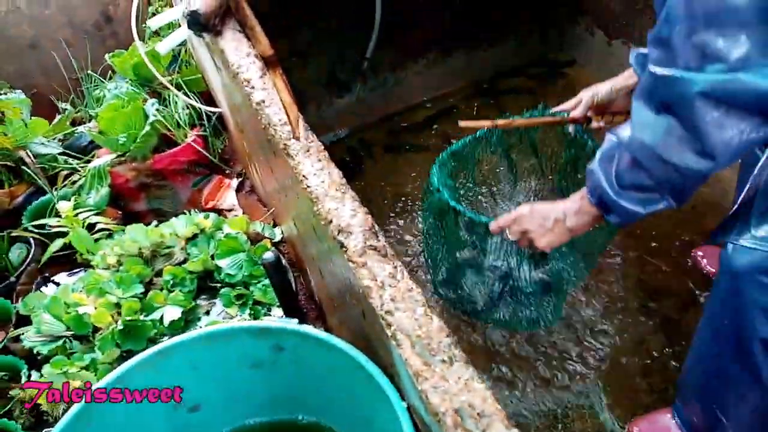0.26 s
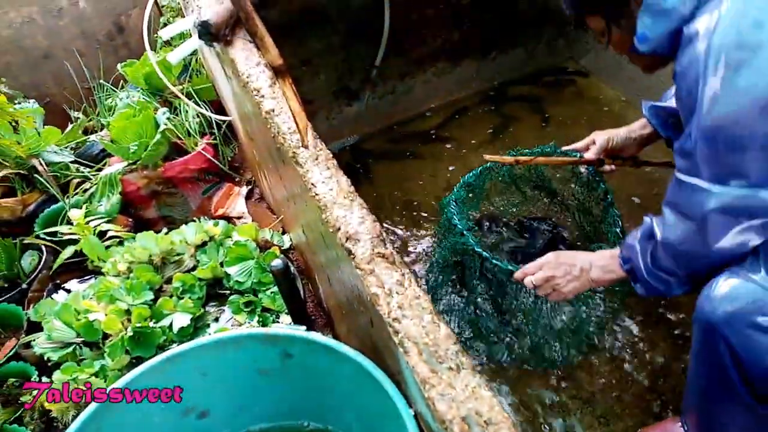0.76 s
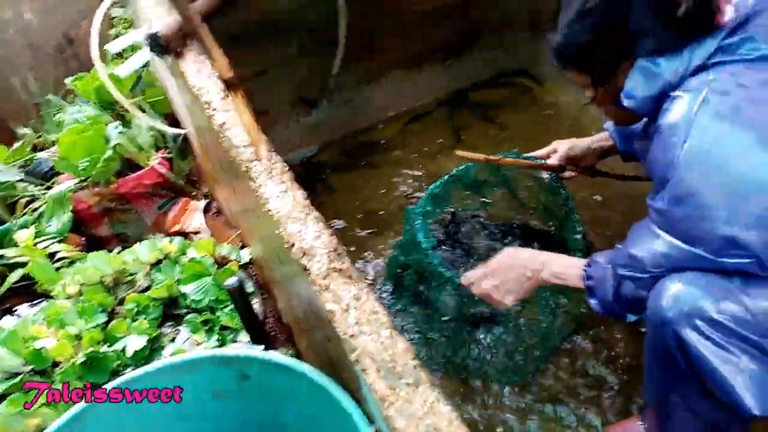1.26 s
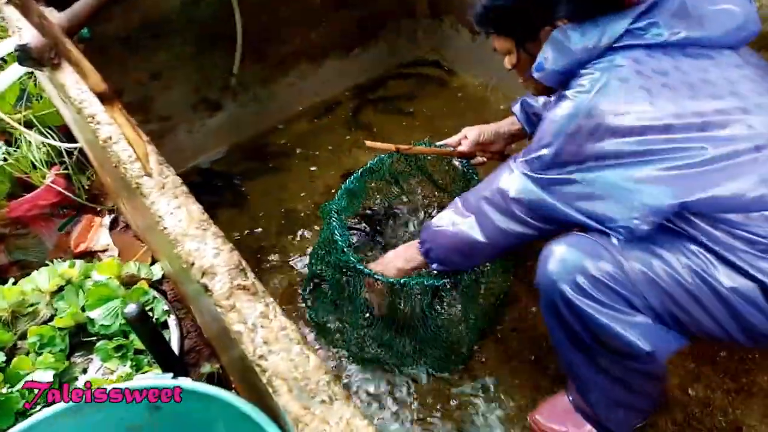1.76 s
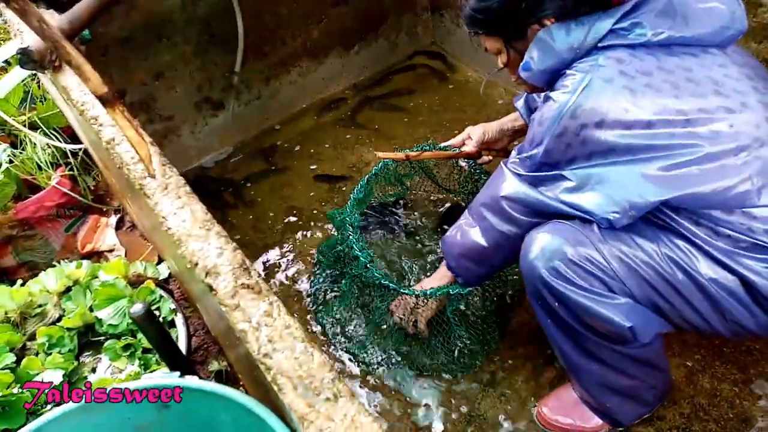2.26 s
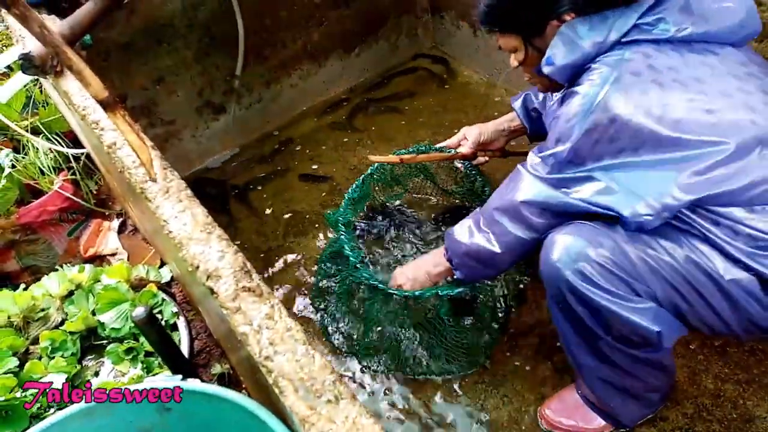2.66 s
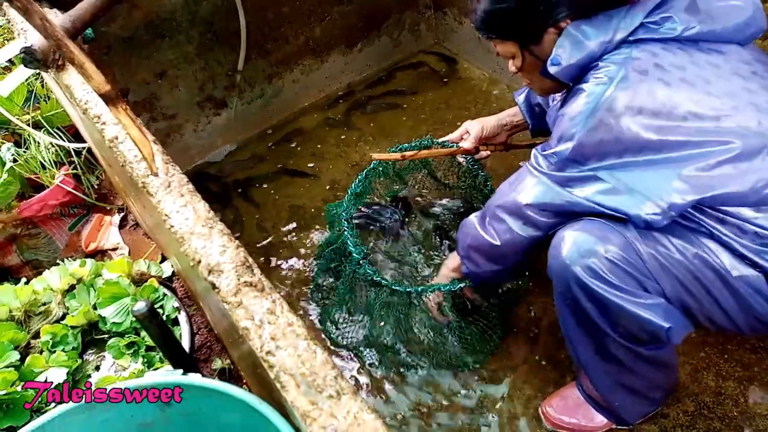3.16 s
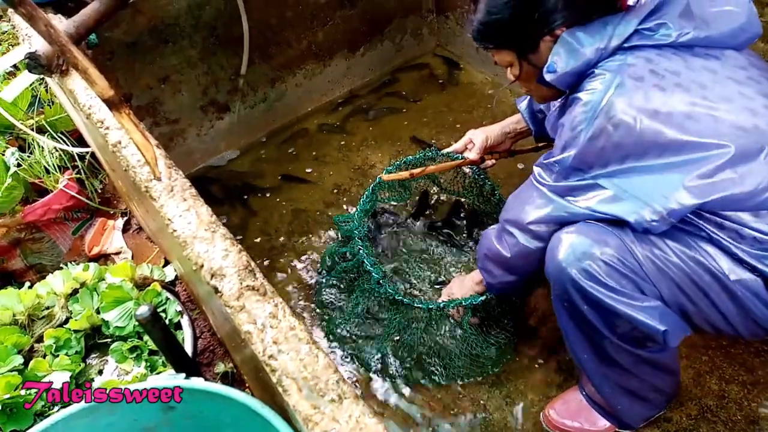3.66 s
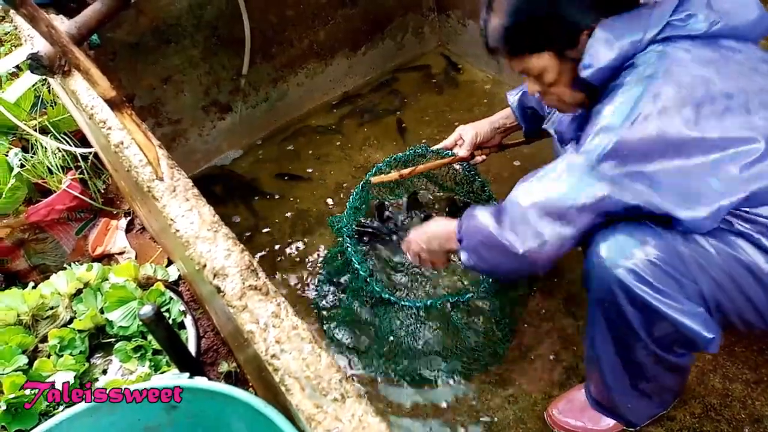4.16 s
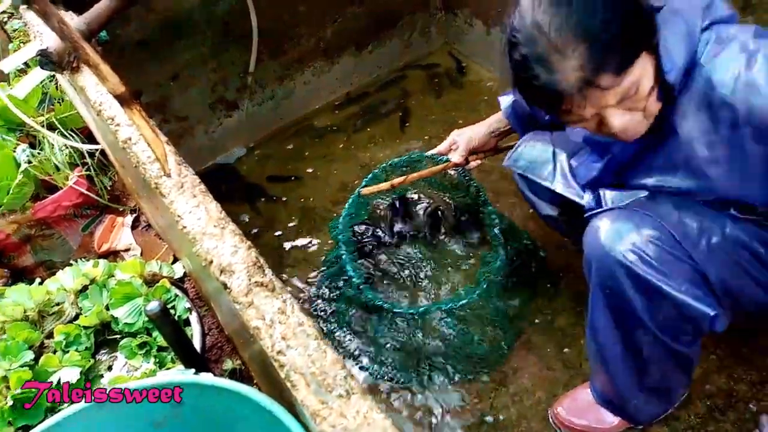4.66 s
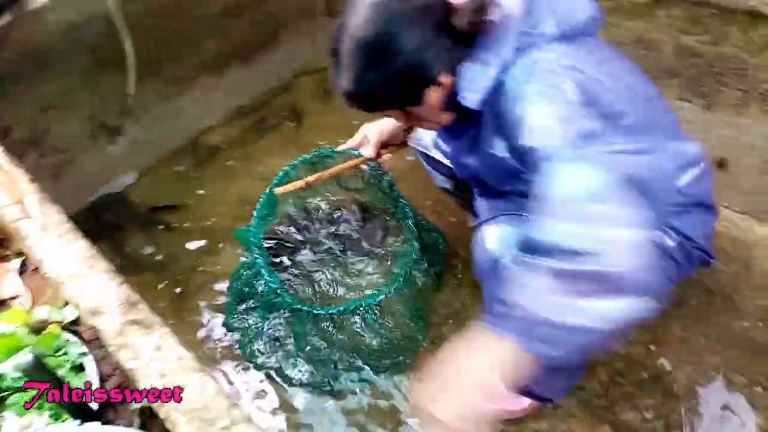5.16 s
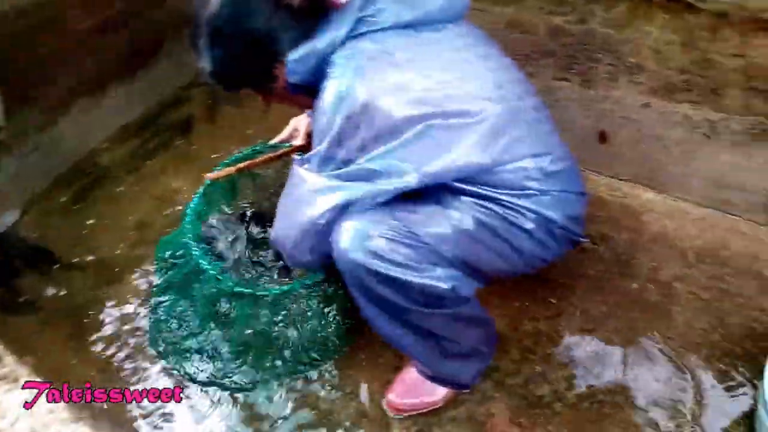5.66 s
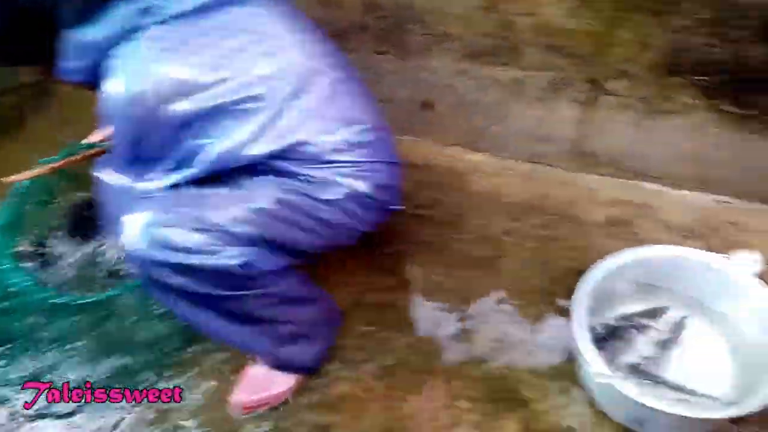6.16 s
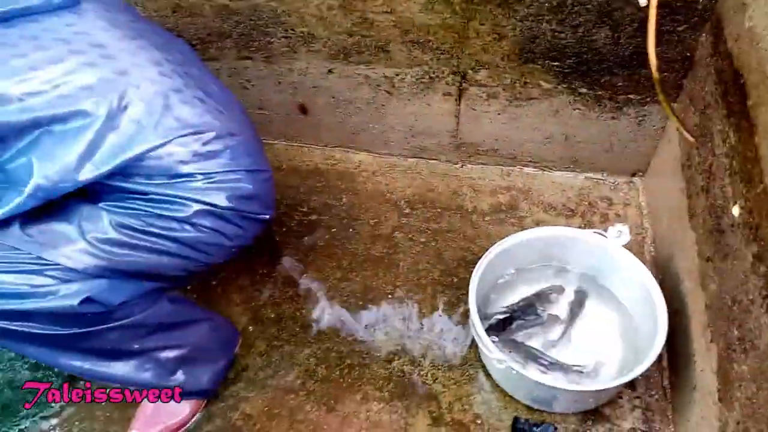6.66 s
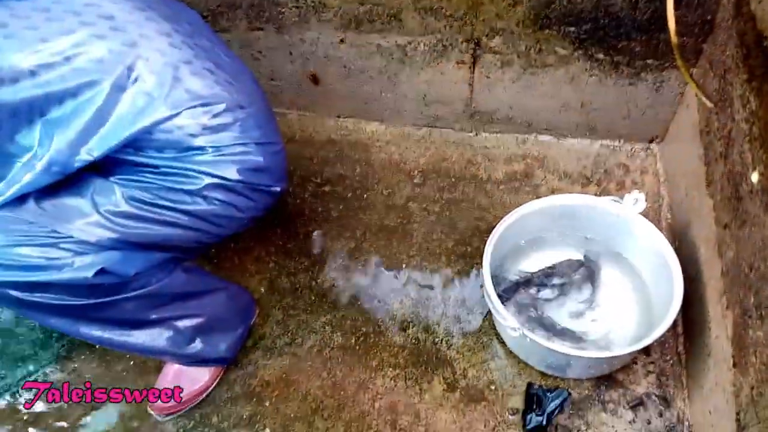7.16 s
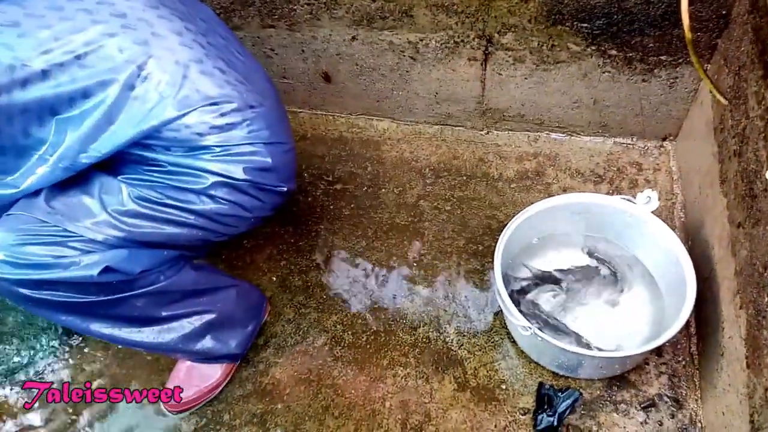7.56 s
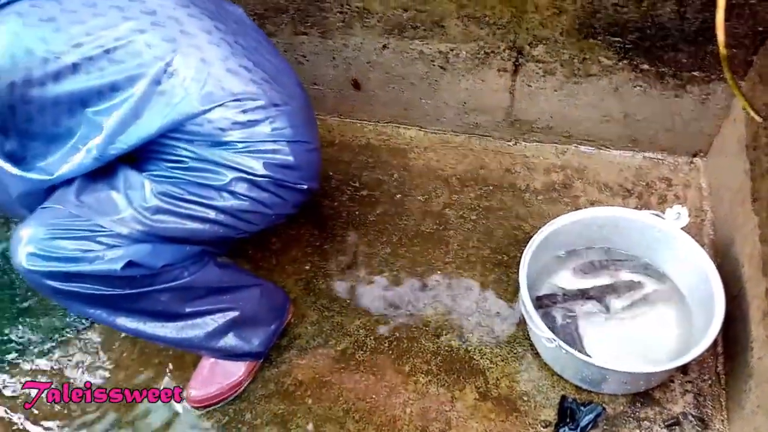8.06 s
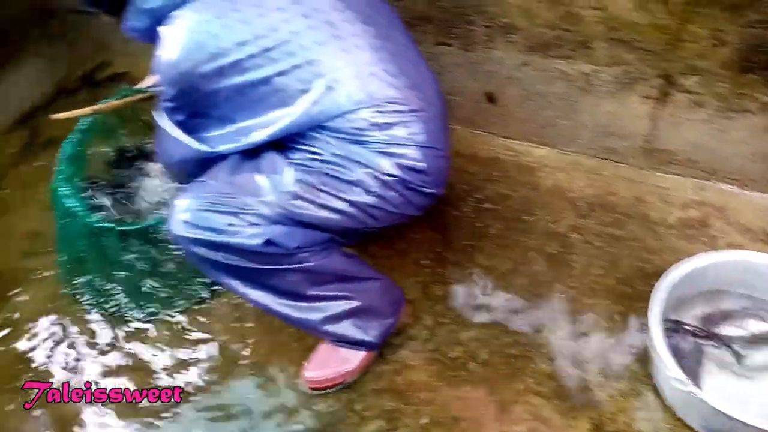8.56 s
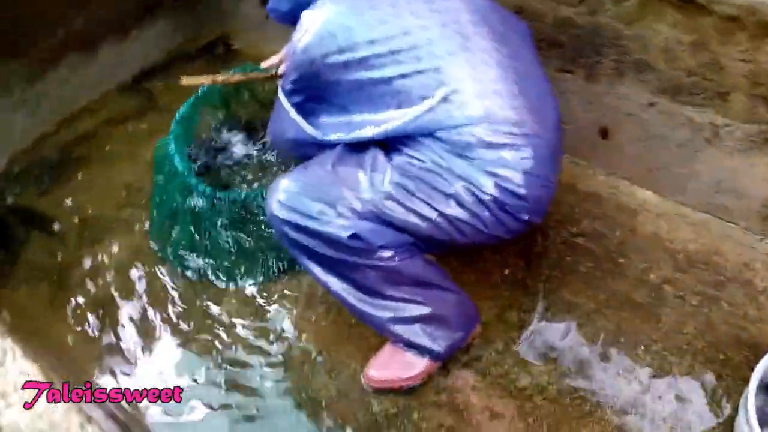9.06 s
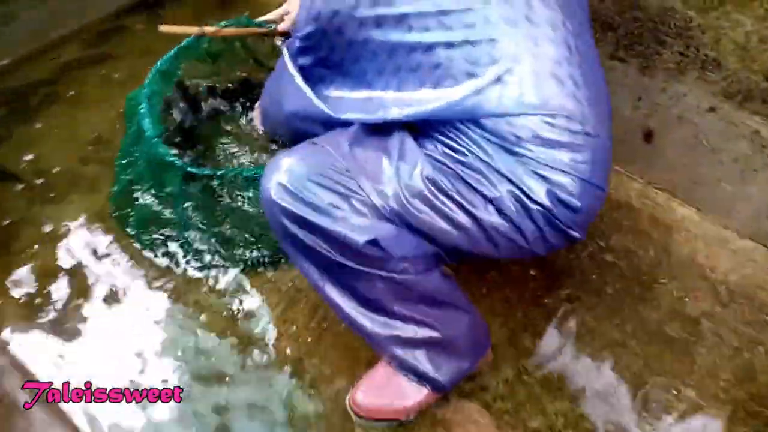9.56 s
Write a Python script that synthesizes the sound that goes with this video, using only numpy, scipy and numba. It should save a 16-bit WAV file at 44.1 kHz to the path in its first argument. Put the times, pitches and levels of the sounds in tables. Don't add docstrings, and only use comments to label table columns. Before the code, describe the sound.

Close stereo sound of fish flapping in a net in a shallow concrete tank. It opens with a rush of draining spray, settles into light drips, small slaps and bubbly plops, goes nearly quiet, then bursts into sharp wet slaps and busier splashing. Walls return short, tight echoes; a very faint motor hums far off. The right side is brighter, the left duller.

```python
import sys
import numpy as np
from scipy import signal
from scipy.fft import rfft, irfft, next_fast_len
from scipy.io import wavfile
from scipy.ndimage import uniform_filter1d, map_coordinates
from numba import njit

SR = 44100
rng = np.random.default_rng(int(sys.argv[2]) if len(sys.argv) > 2 else 0)


def volts_from_db(level):
    exponent = np.asarray(level, float) / 20
    return 10 ** exponent


def pcm_store(signal):
    levels = np.round(np.clip(np.atleast_2d(signal), -1, 1) * 32767)
    wavfile.write(sys.argv[1], SR, levels.astype(np.int16).T)


N = 433062

# peak_s, spray_db, swell_s, fade_s, depth_db
SORTING_THRASHES = [(0, -25.5, .05, 0.23, -10.5), (.28, -34, 0, 0.07, -14), (.68, -46, 0.7, 0.3, -0.5),
                    (.91, -37, 0.22, 0.29, -11.5), (1.43, -34, 0.04, 0.0854, -7.5),
                    (1.67, -41, 0.15, 0.1, -9), (1.83, -42.5, 0.3, 0.16, -6.5), (2.29, -47.5, 1, -0.6, -32),
                    (2.391, -41, 0.17, 0.14, -8.5), (2.501, -45.5, -0.04, 0.3, -3.5),
                    (2.68, -42.5, 0.2, 0.5, -30), (2.86, -39, -0.12, 0.2, -15.5),
                    (3.0, -36, 0.15, -0.5, -14), (3.16, -40, 0.07, 1.43, -17.5),
                    (3.341, -32.5, 0.02, -0.27, -11), (3.499, -42, 0.44, -1.13, -17),
                    (3.65, -41, 0.04, -0.54, -8), (3.885, -43.5, 0.02, 0.1, -0.5),
                    (4.25, -47.5, -0.5, 0.46, -5.5), (4.745, -41, 0, 1, -8),
                    (4.985, -28.5, -0.0436, 0.1, -9.5), (5.091, -32, -0.0228, 0.0952, -6.5),
                    (5.218, -30, -0.06, 0.06, -10.5), (5.43, -47, 0.1, 0.17, -13)]
# peak_s, spray_db, swell_s, fade_s, depth_db
GRABBING_THRASHES = [(5.712, -35, 0.04, 0, -9), (5.904, -42.5, 0.03, 0.03, -2),
                     (5.978, -27.5, -0.0044, 0.08, -10), (6.11, -33, 0, 0.07, -2),
                     (6.23, -27.5, -0.03, 0.14, -25), (6.3, -31, 0.11, 0.14, -5),
                     (6.42, -32, 0.05, 0.1, -6.5), (6.731, -37.5, 0.15, 0.09, -1.5),
                     (6.88, -36, 0.17, 0.09, -3), (6.977, -26, 0.1046, 0.0755, -3.5),
                     (7.08, -34, 0.1, -0.05, -7.5), (7.22, -39, 0.86, 2, -23), (7.325, -35, -0.16, 0.2, -8),
                     (7.381, -32, 0, 0.12, -9), (7.7, -35, 0.02, 0.19, -2.5), (7.84, -34, 0.02, 0.07, -6.5),
                     (8.142, -34, 0.08, 0.1, -6), (8.442, -43, -0.17, 0.26, -23.5),
                     (8.499, -31.5, 0.05, 0.0947, -8.5), (8.859, -39, 0.1, 0.14, -11.5),
                     (9.036, -33.5, -0.04, 0.1, -9.5), (9.118, -40, -0.09, -0.21, 4),
                     (9.24, -35, 0.01, 0.05, -14), (9.789, -37.5, 0.12, -3.5, -21)]
# offset_db, depth_share (ratio), linger (factor), calm_offset_db
WATER_ANSWERS = [
    (0.0, 0.029, 0.85, 0),
    (-3.5, 0.45, 0.88, -16),
    (-2, 0.91, 0.89, -17),
    (-23.5, 0.67, 1, 1),
]
# time_s, spray_db, slosh_db
CALM_WATER = [(0, -32, -44.5), (.9, -48.5, -51), (1.3, -49, -57), (1.7, -49.5, -47.5), (2.0, -52, -70.5),
              (3.2, -60, -62), (4.1, -67, -63), (4.3, -60.5, -53), (4.6, -57, -59.5), (5.3, -48, -50.5),
              (6.3, -40.5, -68), (7.5, -71, -65), (8.8, -55.5, -69.5), (9.5, -48, -86), (9.82, -42, -69)]
# frequency_hz, density_db (per Hz)
SPRAY_SPECTRUM = [(2200, 4.5), (3600, 0.5), (6400, 6.5), (9000, 2), (11000, -5), (13600, -9), (14700, 0.5),
                  (16000, 3)]
# start_s, peak_db, lowest_hz, t60_s
TAIL_SLAPS = [(.0016, -15, 5030, 0.0086), (.141, -21, 5050, 0.013), (0.5504, -19.5, 2040, 0.032),
              (0.8322, -20, 4020, 0.027), (1.176, -25, 3220, 0.027), (1.399, -16, 2190, 0.17),
              (2.47, -18, 1780, 0.03), (2.995, -10.5, 2006, 0.074), (3.154, -11, 4700, 0.028),
              (3.2887, -14.5, 4040, 0.019), (4.746, -13.5, 2480, 0.048), (4.8426, -18.5, 2800, 0.098),
              (4.9741, -4.5, 2700, 0.017), (5.062, -9.5, 2600, 0.07), (5.206, -10, 4000, 0.021),
              (5.965, -14, 3280, 0.044), (6.096, -14.5, 2000, 0.03), (6.4184, -15, 2970, 0.042),
              (6.729, -18.5, 2560, 0.082), (6.916, -9, 2540, 0.035), (6.983, -18, 2200, 0.031),
              (7.0647, -16, 2000, 0.027), (7.3837, -13.5, 2160, 0.02), (7.702, -17, 2485, 0.023),
              (8.493, -15, 3820, 0.013), (8.532, -12.5, 4530, 0.092), (9.006, -19.5, 5800, 0.055)]
# start_s, peak_db, centre_hz, width_octaves
LONE_DROPS = [(0.0293, -9, 6000, 0.44), (0.3903, -14.5, 7900, 0.5), (0.511, -14.5, 6400, 0.15),
              (0.6832, -17, 5700, 3.4), (1.814, -16.5, 4900, 0.22), (1.9952, -20.5, 6500, 1.5),
              (2.154, -20, 6330, 0.88), (2.84, -13.5, 6590, 0.63), (2.868, -10.5, 5190, 0.55),
              (3.495, -12.5, 5230, 0.82), (3.8723, -18.5, 4140, 0.37), (4.9105, -22.5, 2530, 0.69),
              (5.205, -12, 11800, 1), (5.529, -15.5, 6300, 0.22), (5.8038, -21, 6450, 0.92),
              (6.1766, -13, 6160, .3), (6.687, -20.5, 6070, 0.7), (6.878, -8.5, 5900, 0.5),
              (6.964, -10, 5600, 0.6), (7.0862, -11, 6260, 0.47), (7.1415, -12, 9120, 1.1),
              (7.205, -16.5, 7970, 0.59), (7.343, -7.5, 6800, .65), (7.83, -18, 3620, 2),
              (8.0318, -16, 6070, 0.27), (8.4392, -5, 6400, 0.95), (8.8747, -13.5, 5420, 0.87),
              (9.1317, -14, 5860, 0.47), (9.23, -13.5, 5770, 0.41), (9.247, -8, 6280, 0.18)]
# start_s, peak_db, centre_hz, t60_s
WATER_SHEETS = [(0.4864, -31.5, 1720, 0.044), (0.749, -25.5, 4370, 0.075), (0.9043, -26, 2660, 0.069),
                (1.3497, -30.5, 3536, 0.059), (1.452, -29, 2300, 0.042), (1.7569, -32, 3200, 0.06),
                (1.814, -33, 2050, 0.056), (1.8798, -28, 2700, 0.044), (1.9899, -39.5, 4330, 0.05),
                (2.2857, -31.5, 2100, 0.039), (2.509, -32, 1450, 0.054), (2.7596, -32, 2730, 0.035),
                (2.941, -27.5, 2560, 0.062), (2.9687, -22.5, 3550, 0.048), (3.0954, -33.5, 2696, 0.061),
                (3.2839, -24, 3750, 0.063), (3.3333, -24.5, 2420, 0.089), (3.4591, -35, 1300, 0.023),
                (3.597, -33.5, 3600, 0.029), (3.714, -35, 2860, 0.046), (1.587, -31.5, 4060, 0.063),
                (5.919, -29, 1630, 0.06), (5.9848, -23.5, 1810, 0.051), (6.0114, -31, 1810, 0.038),
                (6.2178, -21, 4250, 0.061), (6.273, -21.5, 2230, 0.062), (6.3274, -24, 1340, 0.044),
                (6.356, -23, 2186, 0.13), (6.4036, -22, 2180, 0.045), (6.474, -29, 2850, 0.055),
                (6.6345, -31, 2210, 0.059), (6.7164, -39, 2700, 0.043), (6.8676, -27, 2180, 0.05),
                (6.952, -34, 1680, 0.05), (6.977, -18.5, 1590, 0.039), (7.009, -27, 1430, 0.061),
                (7.1667, -26.5, 3970, 0.02), (7.3213, -25.5, 2744, 0.045), (7.6774, -25.5, 4060, 0.031),
                (7.7112, -28, 1610, 0.032), (7.9299, -29.5, 4130, 0.054), (8.1927, -29, 2320, 0.058),
                (8.3015, -35, 4090, 0.043), (8.4144, -38, 2430, 0.096), (8.8358, -29, 2310, 0.05),
                (9.028, -28, 2430, 0.056), (9.2324, -26, 4050, 0.057), (9.6969, -31, 3740, 0.085)]
# start_s, peak_db, centre_hz, t60_s
FLUNG_BEADS = [(0.0355, -20, 6100, 0.02), (0.075, -19.5, 5990, 0.044), (0.1762, -26, 6900, 0.045),
               (0.2254, -31.5, 6400, 0.033), (0.2748, -24, 5180, 0.072), (0.318, -29, 5610, 0.03),
               (0.435, -29, 4470, 0.047), (1.399, -21.5, 6300, 0.028), (1.703, -28.5, 6600, 0.038),
               (2.247, -38, 6140, 0.017), (2.379, -33, 5500, 0.033), (2.5366, -27, 5400, 0.022),
               (2.625, -25.5, 6460, 0.031), (2.712, -33.5, 6360, 0.054), (2.794, -32, 5340, 0.017),
               (3.3227, -20, 7800, 0.046), (3.378, -23, 6360, 0.069), (3.4777, -30, 5600, 0.012),
               (3.6544, -32, 6540, 0.046), (4.9445, -26, 4900, 0.021), (5.1766, -26, 6030, 0.074),
               (5.843, -43, 5130, 0.024), (5.8835, -47, 6340, 0.025), (6.2342, -20, 5640, 0.026),
               (6.2487, -19.5, 5880, 0.016), (6.308, -26, 6100, 0.027), (6.641, -24.5, 6300, 0.03),
               (7.0687, -21, 6300, 0.022), (7.2542, -28, 5560, 0.058), (7.317, -38.5, 6560, 0.027),
               (7.3704, -18.5, 5700, 0.04), (7.674, -21, 7700, 0.037), (7.866, -23.5, 6320, 0.031),
               (8.0062, -29, 6300, 0.027), (8.253, -26, 5650, 0.016), (8.6142, -28.5, 7200, 0.027),
               (8.636, -29, 6240, 0.039), (8.96, -28.5, 5930, 0.03), (9.111, -29, 6400, 0.03),
               (9.7587, -31, 4860, 0.03)]
# start_s, peak_db, pitch_hz (at first), life_s
SORTING_BUBBLES = [(0.058, -31, 960, 0.034), (.093, -35, 960, 0.054), (.552, -32, 960, 0.0076),
                   (.686, -32, 785, 0.012), (1.571, -33, 1427, 0.025), (1.757, -36, 1660, 0.021),
                   (1.912, -42, 990, 0.0074), (1.982, -41.5, 846, 0.028), (5.603, -38, 691, 0.013),
                   (2.366, -36.5, 876, 0.038), (2.466, -25.5, 2000, 0.0099), (2.519, -35.5, 437, 0.025),
                   (3.389, -37, 660, 0.019), (3.527, -31, 798, 0.026), (3.6, -32.5, 840, 0.014),
                   (3.882, -33.5, 708, 0.0066), (3.917, -27, 1480, 0.0092), (4.308, -32, 493, 0.0078),
                   (4.909, -22, 2740, 0.0074), (4.926, -34.5, 1276, 0.031), (4.976, -22.5, 520, 0.018),
                   (5.098, -26.5, 894, 0.0091), (5.355, -27.5, 455, 0.006), (5.406, -30.5, 1486, 0.01),
                   (5.436, -32, 894, 0.0058), (.12, -37, 990, 0.017), (.345, -33.5, 1010, 0.014),
                   (.409, -27.5, 1430, 0.0091), (.885, -38.5, 800, 0.013), (1.145, -39.5, 850, 0.012),
                   (2.611, -43.5, 1883, 0.047), (2.67, -44.5, 1893, 0.057), (2.896, -35, 970, 0.0091),
                   (3.2, -37.5, 1410, .01), (3.456, -34.5, 1012, 0.013), (4.742, -35, 910, 0.011),
                   (5.27, -36, 1035, 0.0072), (0.771, -29, 1390, 0.0097), (1.234, -40, 1535, 0.019),
                   (3.742, -40.5, 1650, 0.013), (4.008, -39.5, 1736, 0.014), (4.523, -36, 600, 0.0075)]
# start_s, peak_db, pitch_hz (at first), life_s
GRABBING_BUBBLES = [(5.675, -34.5, 1384, 0.025), (5.858, -40, 900, 0.019), (6.096, -24, 2010, .009),
                    (6.274, -21, 1230, 0.0075), (6.54, -33, 815, 0.028), (6.912, -24, 1330, 0.0073),
                    (7.063, -18.5, 2210, 0.008), (7.38, -31, 926, 0.032), (7.702, -19, 1520, 0.0068),
                    (7.762, -30, 498, 0.018), (7.808, -37, 457, 0.029), (7.838, -31, 1165, 0.038),
                    (8.07, -32, 1045, 0.017), (8.125, -30, 790, 0.03), (8.407, -25.5, 2416, 0.015),
                    (8.476, -24.5, 935, 0.02), (8.537, -32, 926, 0.031), (8.835, -26, 1920, 0.007),
                    (8.871, -38, 899, 0.02), (9.186, -38, 916, 0.025), (9.226, -36, 890, 0.02),
                    (9.671, -32, 790, 0.005), (5.884, -34, 1010, 0.018), (6.168, -31, 1800, 0.015),
                    (6.213, -26.5, 860, 0.009), (7.17, -35, 1170, 0.011), (7.585, -37.5, 1430, 0.018),
                    (9.289, -44, 880, 0.0084), (9.11, -40, 510, 0.012), (7.742, -26.5, 2260, 0.014),
                    (8.088, -32, 1430, 0.0077), (8.275, -39.5, 1230, 0.0072)]
# start_s, peak_db, pitch_hz (at first), length_s, glide_octaves
CLOSING_CAVITIES = [
    (1.881, -30, 1550, 0.086, -.25),
    (2.504, -36.5, 603, 0.063, 1.1),
    (4.91, -30, 2300, .08, -.6),
    (5.425, -29, 641, 0.076, 0.64),
    (5.697, -29, 1485, 0.07, 0.31),
    (8.404, -33.5, 1820, 0.07, -0.23),
]
# time_s, firing_hz, level_db
FAR_MOTOR = [(0, 70, -54.5), (.45, 73.25, -61.5), (.9, 78, -53), (1.4, 81.2, -59), (1.8, 85.6, -63.5),
             (2.3, 79.7, -69), (3.3, 77.8, -65), (3.9, 75.8, -77), (5.1, 73.6, -64), (5.6, 79.4, -58),
             (6.0, 82.2, -58.5), (6.35, 81.8, -57), (6.5, 78.1, -84), (8, 77.4, -79), (9.82, 77.8, -82)]
# multiple (of the firing rate), level_db
MOTOR_ORDERS = [(1, -0.5), (1.5, -9), (2, -8), (2.5, -5.5), (3, -7.5), (4, -5)]
# frequency_hz, density_db (per Hz)
AIR_SPECTRUM = [(30, -40), (50, 1), (180, 11), (256, -58), (320, 10.5), (715, -24), (965, -13), (4030, 0),
                (6490, 6.5), (16000, -56)]
# time_s, lead_ms, shading_db
LEFT_HEAD_START = [(0, 1.03, 1.5), (1.5, 1.026, 0), (3, 1.24, 0), (4.2, 1, 0), (4.7, 0.78, 1),
                   (5.6, 0.79, 0), (6, 1.41, -0.5), (8.6, 1.45, -0.5), (9.2, 1.06, 1), (9.82, 1.57, -3)]
# frequency_hz, gain_db
LEFT_SHADOW = [(60, -7.5), (150, -4.5), (380, -7), (950, -5), (2380, -3), (5980, -12), (15000, -25)]


def rms_one(x):
    return x / np.sqrt(np.mean(x ** 2) + 1e-20)


def in_time(rows):
    times_s, *columns = np.transpose(rows)
    return [np.interp(np.arange(N) / SR, times_s, column) for column in columns]


def coloured(x, spectrum):
    size = next_fast_len(N + 4096)
    hz, db = np.transpose(spectrum)
    bins_hz = np.arange(size // 2 + 1) * SR / size
    gain = volts_from_db(np.interp(np.log(bins_hz + 1), np.log(hz), db))
    return irfft(rfft(x, size) * gain, size)[..., :N]


def band(x, low_hz, high_hz, order=2):
    sos = signal.butter(order, [low_hz, min(high_hz, SR / 2.2)], "band", fs=SR, output="sos")
    return signal.sosfilt(sos, x)


def drift(rate_hz):
    pole = np.exp(-2 * np.pi * rate_hz * 40 / SR)
    noise = rng.standard_normal(N // 40 + 2002)
    slow = signal.lfilter([1], [1, -2 * pole, pole * pole], noise)[2000:]
    return np.interp(np.arange(N) / 40, np.arange(len(slow)), rms_one(slow))


def wide_noise(alike, length=N):
    common, left, right = rng.standard_normal((3, length))
    alike = np.clip(alike, 0, 1)
    return np.sqrt(alike) * common + np.sqrt(1 - alike) * np.array([left, right])


def churn():
    t = np.arange(0, N, 64) / SR
    drip_db, wade_db = in_time(CALM_WATER)
    peak_s, db, swell_s, fade_s, depth_db = np.transpose(SORTING_THRASHES + GRABBING_THRASHES)[:, :, None]
    levels = []
    calm_levels = (drip_db, drip_db, drip_db, wade_db)
    for (offset_db, share, linger, calm_offset_db), calm_db in zip(WATER_ANSWERS, calm_levels):
        before = (peak_s - t) / np.maximum(swell_s, .01)
        after = (t - peak_s) / np.maximum(linger * fade_s, .01)
        away = np.where(t < peak_s, before, after)
        power = np.sum(volts_from_db(db + offset_db + share * depth_db - 10 * away) ** 2, axis=0)
        power = np.interp(np.arange(N) / SR, t, power)
        levels.append(10 * np.log10(power + volts_from_db(calm_db + calm_offset_db) ** 2))
    return levels


def impacts():
    rows = [(s, db, hz, wide, 0.011 * (6000 / hz) ** 2.1) for s, db, hz, wide in LONE_DROPS]
    rows += [(s, db + 2.5, hz, 0.78, max(t60, .004)) for s, db, hz, t60 in WATER_SHEETS]
    rows += [(s, db + 4.5, hz, 0.34, max(t60, .004)) for s, db, hz, t60 in FLUNG_BEADS]
    struck = [(s, db, hz / 2 ** (wide / 2), hz * 2 ** (wide / 2), t60) for s, db, hz, wide, t60 in rows]
    struck += [(s, db, hz, 7130 * (hz / 3000) ** 0.25, t60) for s, db, hz, t60 in TAIL_SLAPS]
    return struck


def slaps():
    out = np.zeros((2, N))
    t = np.arange(round(.15 * SR)) / SR
    for start_s, db, low_hz, high_hz, t60 in impacts():
        ragged = volts_from_db(3.93 * rms_one(uniform_filter1d(rng.standard_normal(len(t)), size=40)))
        decay = volts_from_db(-60 * t / t60) + 0.13 * volts_from_db(-60 * t / 0.097)
        shape = decay * (1 - np.exp(-t / (0.089 * t60)))
        burst = wide_noise(0.43, length=len(t)) * shape * ragged
        top = band(burst, low_hz, high_hz)
        top = top + 0.04 * band(burst, 6200, 12500, order=1)
        top = top + 0.085 * band(burst, 13300, 14800)
        body = 5.7 * t60 * band(burst, 1120, 2420)
        at = round(start_s * SR)
        out[:, at:at + len(t)] += volts_from_db(db - 2.5) * (top + body)[:, :N - at] / np.abs(top[1]).max()
    return out


@njit
def add_bubbles(out, start, size, hz, t60, rise, onset_s, rate):
    for k in range(len(start)):
        length = int(t60[k] * rate)
        phase = 0.0
        for i in range(min(length, len(out) - start[k])):
            phase += 2 * np.pi * hz[k] * 2 ** (rise[k] * min(4 * i / length, 1.5)) / rate
            swell = 1 - np.exp(-i / (onset_s[k] * rate + 1))
            out[start[k] + i] += size[k] * swell * np.exp(-6.9 * i / length) * np.sin(phase)


def swarm(low_hz, high_hz, cycles, spread_db, clumps, scatter_ms, count):
    draw = rng.random((count, 6))
    out = np.zeros((2, N))
    start = (draw[:, 0] * N).astype(np.int64)
    hz = low_hz * (high_hz / low_hz) ** draw[:, 1]
    loudness = volts_from_db(-spread_db * np.log(draw[:, 2] + .04))
    size = loudness * clumps[start] * (hz / low_hz) ** 0.61
    life_s = cycles * (0.25 + 1.77 * draw[:, 3]) / hz
    rise_octaves = 0.663 * draw[:, 4] ** 2
    left_lag = draw[:, 5] * scatter_ms * SR / 1000
    for port, lag in zip(out, (left_lag, 0)):
        add_bubbles(port, start + np.int64(lag), size, hz, life_s, rise_octaves, 0.19 / hz, SR)
    return rms_one(out)


def spray(level_db, surge_db):
    fizz_clumps = volts_from_db(surge_db + 8.5 * np.tanh(2.1 * drift(46)))
    fizz = swarm(3860, 13700, cycles=19.8, spread_db=3.0, clumps=fizz_clumps, scatter_ms=0.2, count=16000)
    bead_clumps = volts_from_db(surge_db + 1.0 * drift(12.0))
    beads = swarm(3960, 9330, cycles=66.0, spread_db=1.5, clumps=bead_clumps, scatter_ms=0.33, count=3000)
    edges_hz = np.geomspace(2500, 16000, num=5)
    gusts_db = surge_db + 2.4 * drift(24.0)
    hiss = np.zeros((2, N))
    for low_hz, high_hz in zip(edges_hz, edges_hz[1:]):
        hiss += band(wide_noise(0.22), low_hz, high_hz) * volts_from_db(gusts_db + 3.03 * drift(29.4))
    mixed = 0.7 * fizz + 0.28 * beads + 0.94 * rms_one(hiss)
    return volts_from_db(level_db) * rms_one(coloured(mixed, SPRAY_SPECTRUM))


def bubbling(level_db, surge_db, low_hz, high_hz, cycles, alike, count):
    clumps = volts_from_db(surge_db + 3.96 * np.tanh(0.8 * drift(19)))
    bubbles = swarm(low_hz, high_hz, cycles, spread_db=2.5, clumps=clumps, scatter_ms=0.32, count=count)
    noise = rms_one(band(wide_noise(alike), low_hz, high_hz) * clumps)
    return volts_from_db(level_db) * rms_one(bubbles + .25 * noise)


def plops():
    trapped = [(s, db - 6.5, hz, 0.21 * t60) for s, db, hz, t60 in WATER_SHEETS]
    start_s, db, hz, life_s = np.transpose(SORTING_BUBBLES + GRABBING_BUBBLES + trapped)
    out = np.zeros(N)
    life_s = np.maximum(life_s, .003)
    glide = 0.047 - 0.051 * np.log2(hz / 1000)
    start = (start_s * SR).astype(np.int64)
    add_bubbles(out, start, volts_from_db(db + 5.0), hz, 2.98 * life_s, glide, 0.18 * life_s, SR)
    satellite_db, satellite_s, satellite_octaves = -12, .025, 0.245
    for late, apart in np.transpose(rng.random((len(start_s), 2, 2))):
        start = ((start_s + satellite_s * late) * SR).astype(np.int64)
        satellite_hz = hz * 2 ** (satellite_octaves * (2 * apart - .6))
        size = volts_from_db(db + 6.0 + satellite_db)
        add_bubbles(out, start, size, satellite_hz, 3.0 * life_s, glide, 0.16 * life_s, SR)
    start_s, db, hz, length_s, glide = np.transpose(CLOSING_CAVITIES)
    start = (start_s * SR).astype(np.int64)
    add_bubbles(out, start, volts_from_db(db + 3.5), hz, length_s, glide, 0.062 * length_s, SR)
    return out * (1 + .5 * drift(175))


def tank(x):
    t60_s = .08
    t = np.arange(round(.3 * SR)) / SR
    onset = np.clip((t - .002) / 0.00051, 0, 1)
    echoes = rng.standard_normal((2, len(t))) * volts_from_db(-60 * t / t60_s) * onset
    echoes = band(echoes, 640, 3970, order=1)
    echoes = echoes / np.sqrt(np.sum(echoes ** 2) / 2)
    return signal.fftconvolve(x, echoes, axes=1)[:, :N]


def motor():
    firing_hz, hum_db = in_time(FAR_MOTOR)
    phase = 2 * np.pi * np.cumsum(firing_hz * (1 + .005 * drift(6))) / SR
    swing_db = hum_db + 60
    hum = np.zeros(N)
    for multiple, db in MOTOR_ORDERS:
        if multiple == 1:
            order_db = db + swing_db
        else:
            order_db = db + 0.67 * swing_db + 6 * drift(2.5)
        hum += np.sin(multiple * phase + multiple * multiple) * volts_from_db(order_db)
    rumble = rms_one(band(wide_noise(1.0), 79, 235)) * volts_from_db(0.48 * drift(19.0))
    return volts_from_db(-59.5) * hum + volts_from_db(-62 + 0.38 * swing_db) * rumble


def air():
    return volts_from_db(-65) * rms_one(coloured(wide_noise(0.37), AIR_SPECTRUM))


def scene():
    spray_db, droplets_db, gurgle_db, slosh_db = churn()
    surge_db = 1.14 * np.tanh(1.0 * drift(15.5))
    droplets = bubbling(droplets_db, surge_db, low_hz=1694, high_hz=4065, cycles=26.9, alike=0.4, count=4500)
    gurgle = bubbling(gurgle_db + 0.5, surge_db, low_hz=765.4, high_hz=1869, cycles=30.1, alike=0.14,
                      count=3200)
    slosh = bubbling(slosh_db - 2.5, surge_db, low_hz=257, high_hz=552, cycles=11.5, alike=0.99, count=1200)
    water = spray(spray_db, surge_db) + droplets + gurgle + slosh + slaps() + plops()
    left, right = water + volts_from_db(-12) * tank(water) + motor()
    lead_ms, shading_db = in_time(LEFT_HEAD_START)
    left = map_coordinates(left, [np.arange(N) + lead_ms * SR / 1000], order=3, mode="nearest")
    return np.array([left * volts_from_db(shading_db), right]) + air()


def top_cut(x):
    return signal.sosfilt(signal.butter(12, 15680, fs=SR, output="sos"), x)


def record(dry):
    cutoff_hz = 15850
    ports = np.array([coloured(dry[0], LEFT_SHADOW), dry[1]])
    low_pass = signal.cheby2(12, 50, cutoff_hz * 1.03, fs=SR, output="sos")
    ports = signal.sosfilt(low_pass, ports)
    return top_cut(ports)


dry = scene()
out = record(dry)
pcm_store(out)
```